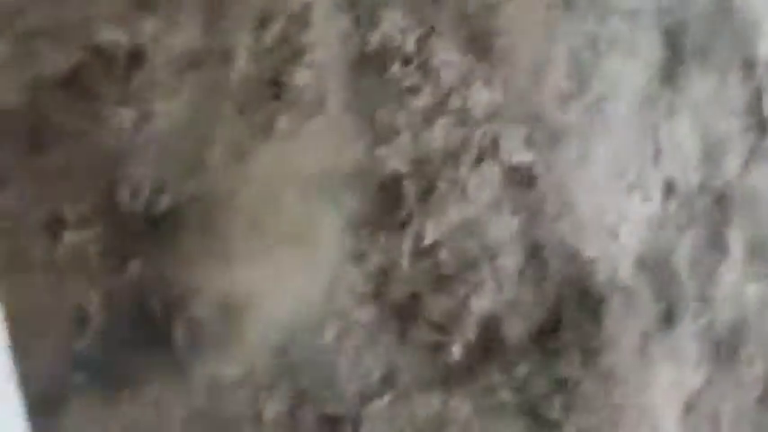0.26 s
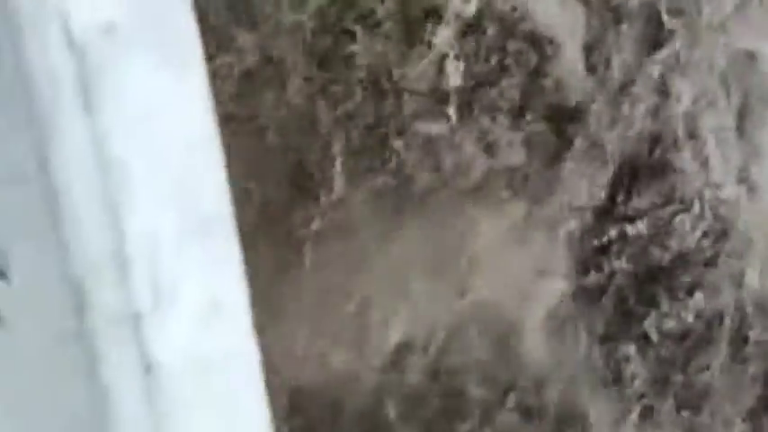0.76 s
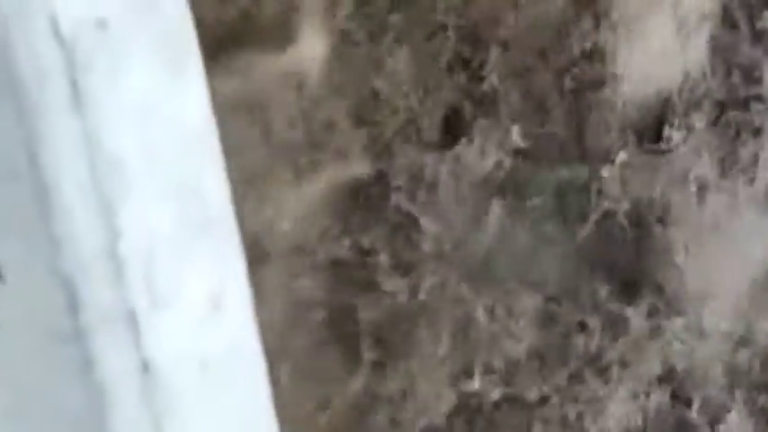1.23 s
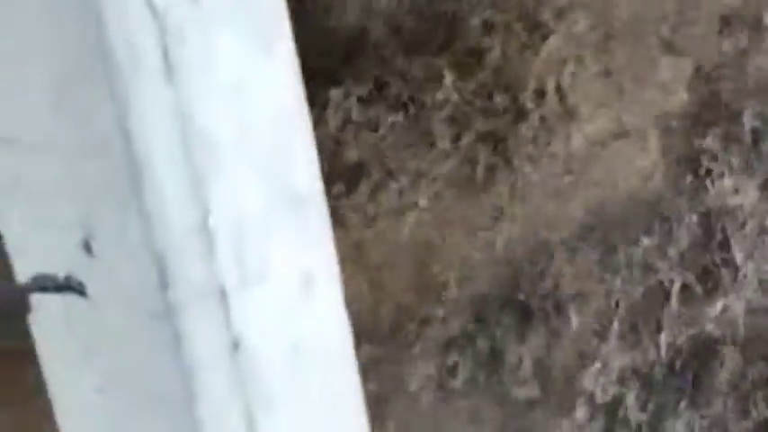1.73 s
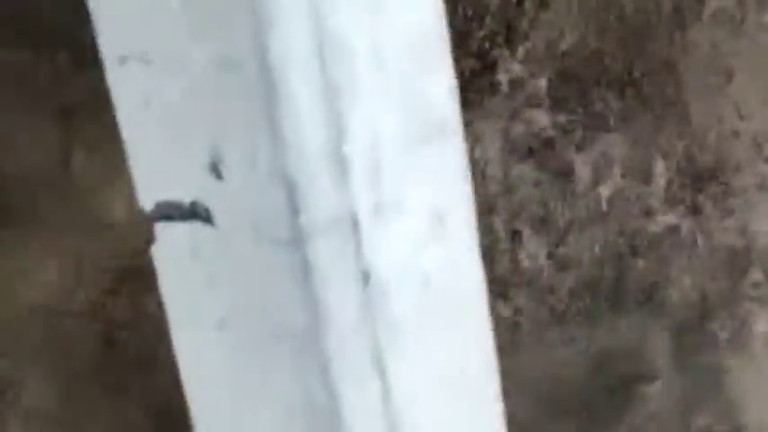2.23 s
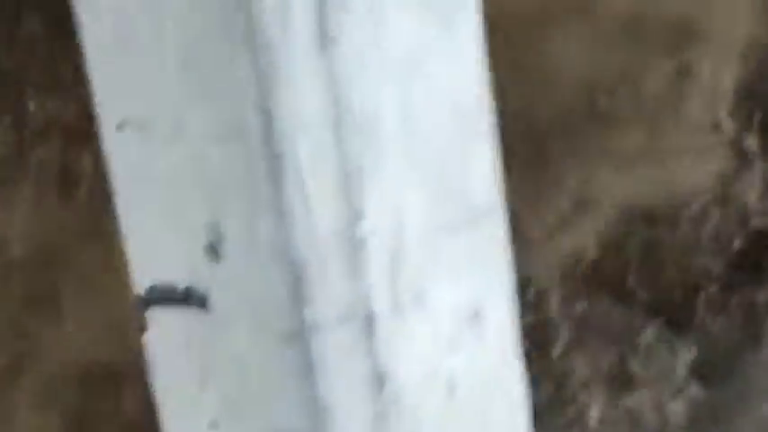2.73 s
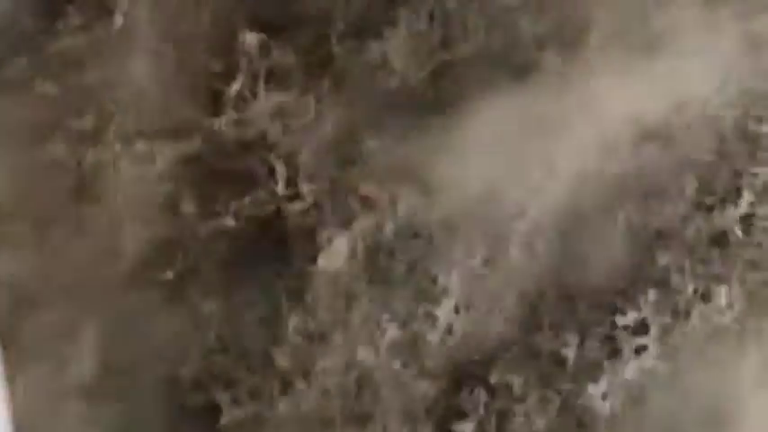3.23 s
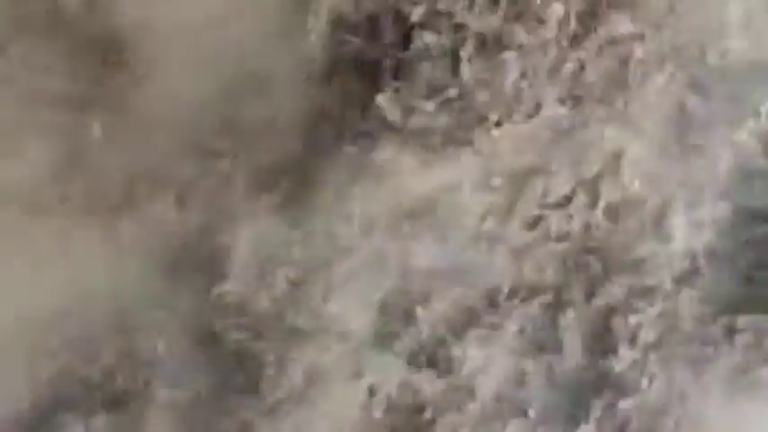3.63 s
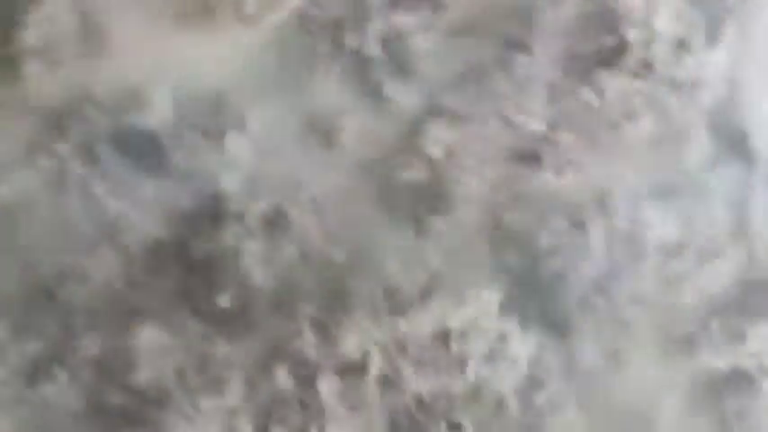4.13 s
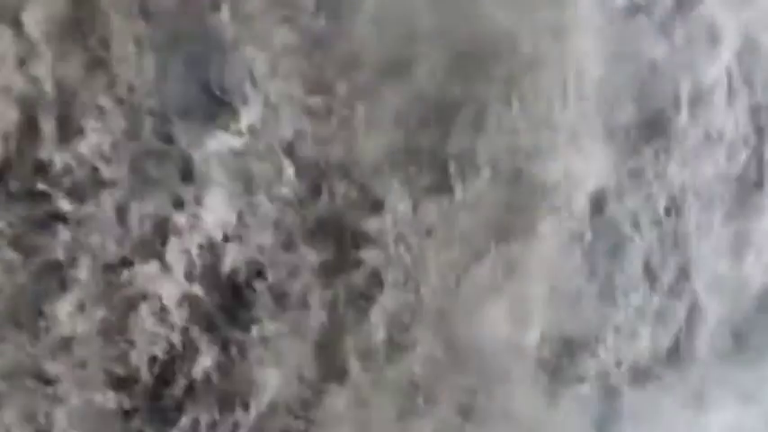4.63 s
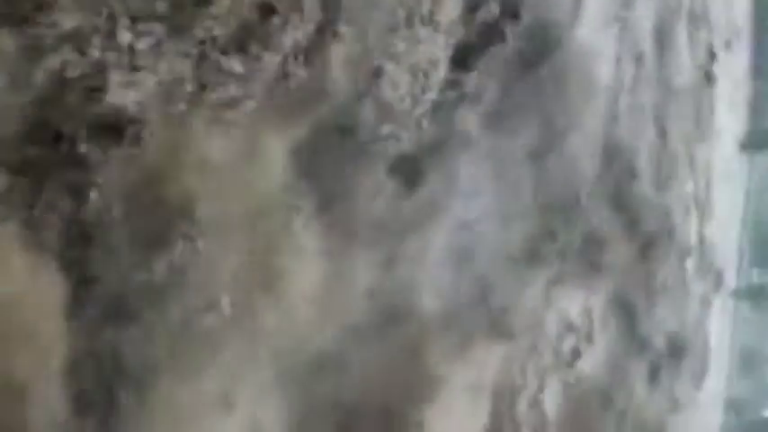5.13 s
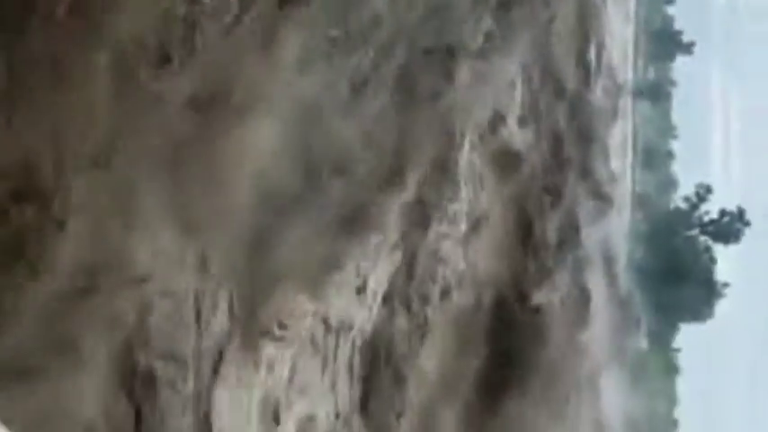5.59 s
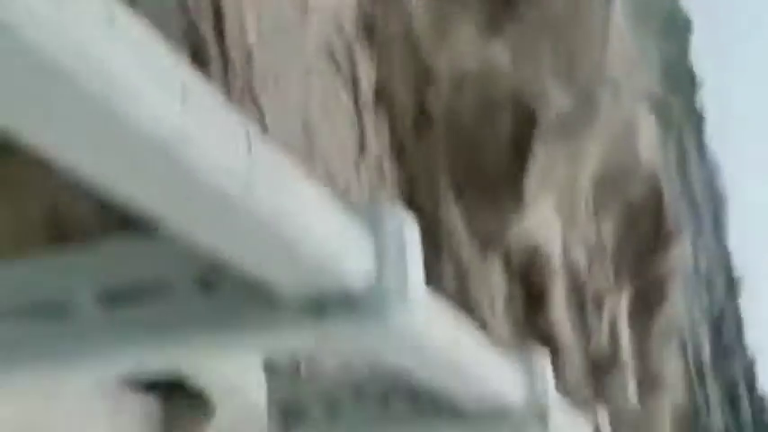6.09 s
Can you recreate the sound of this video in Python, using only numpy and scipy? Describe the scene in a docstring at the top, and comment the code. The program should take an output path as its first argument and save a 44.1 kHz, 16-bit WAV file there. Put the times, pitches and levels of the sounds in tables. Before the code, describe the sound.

A flooded muddy river roars continuously at close range, deep rumble and thick churning under a bright, hissing fizz of spray and bursting bubbles.

```python
"""A muddy river in flood roars under a bridge, at the two sound ports of a hand-held phone.
Countless bursting bubbles merge into rumble, body, churn and fizz from all sides: noise that surges unevenly.
Near drops add a faint spray of short rising tones.
Each port adds a treble resonance, and the hand shades the left one, swings out past the beam and tilts up."""
import sys
import numpy as np
from scipy import signal
from scipy.io import wavfile
from scipy.ndimage import uniform_filter1d

SR = 44100
rng = np.random.default_rng(int(sys.argv[2]) if len(sys.argv) > 2 else 0)


def volts(x):
    """Linear amplitude factor 10**(x/20) for a level x in dB, scalar or array-like."""
    e = np.asarray(x, float) / 20
    return 10 ** e


def unload_audio(sound):
    """Save the sound as a 16-bit wav file, at the path given as the first command line argument."""
    columns = np.transpose(np.atleast_2d(sound))
    # keep every value between -1 and 1, then stretch to whole-number steps
    steps = np.round(np.clip(columns, -1, 1) * 32767)
    wavfile.write(sys.argv[1], SR, steps.astype(np.int16))


N = 280035
FRAME, HOP = 1024, 256  # length and spacing of the short spectra, samples


def evened(x):
    """Scales to rms 1."""
    return x / np.sqrt(np.mean(x ** 2) + 1e-20)


def read(points, hz):
    """Reads a curve of (pitch, value) points on a log-frequency axis."""
    f, value = np.transpose(points)
    return np.interp(np.log(hz + 1), np.log(f + 1), value)


def unit(points, hz):
    """Turns a dB spectrum into a column of gains with rms 1."""
    return evened(volts(read(points, hz)))[:, None]


def hand(t):
    """The three movements of the hand at times t: held out, left port shaded, tilted up."""
    # how the hand moves the phone: time_s, held out past the beam (0-1),
    # left port shaded (0-1), tilted up from the water (0-1)
    hand_path = [(0, 0, 1, 0), (.5, 0.3, 1, .1), (1.4, 0.24, 0.8, 0.54), (1.6, 0, 0, .1), (2.2, .2, 0, 0.2),
                 (2.9, 0, 0.1, 0.1), (3.3, 0.66, 0.3, 0.04), (4.2, 1, .05, 0.1), (4.7, 0.74, .05, 0.15),
                 (5.1, 0.15, .2, 0.2), (5.4, .2, 0.4, 0.5), (5.9, 0.45, 0.4, 0.9), (6.35, .2, .3, 0.7)]
    time_s, *movements = np.transpose(hand_path)
    return [np.clip(np.interp(t, time_s, m), 0, 1) for m in movements]


def surges(t, layer_count, wave_count=24):
    """Slow random swells of rms 1, one row for each layer: sine waves, weaker when faster."""
    rates_hz = np.geomspace(.8, 3, wave_count)[:, None]
    phases = rng.random((layer_count, wave_count, 1))
    waves = np.sin(2 * np.pi * (rates_hz * t + phases)) / np.sqrt(rates_hz)
    return evened(waves.sum(axis=1))


def spray(count=24):
    """Near drops: short rising bubble tones of random size and pitch, left or right."""
    spray_db, drops_per_s = -36, 2800
    size_db = 2.0 * np.minimum(rng.exponential(1, N), 5)
    drops = volts(size_db) * (rng.random(N) < drops_per_s / SR)
    kind = rng.integers(0, count, N)
    out = np.zeros((2, N))
    for k, hz in enumerate(np.geomspace(1500, 9000, count)):
        cycles = np.arange(0, 6, hz / SR)
        tone = np.sin(2 * np.pi * cycles * (1 + 0.025 * cycles))  # the pitch rises as it rings
        bubble = tone * np.exp(-cycles / 2) * (1 - np.exp(-cycles * 4))
        out[k % 2] += signal.oaconvolve(drops * (kind == k), bubble)[:N]
    return volts(spray_db) * evened(out)


def torrent():
    """Merged bubbles as noise: random short spectra, coloured as four layers with drifting patches."""
    # colour of each layer: pitch_hz, level per Hz (dB, only the shape counts)
    rumble_colour = [(15, -15), (30, -1.5), (60, 1), (80, -3), (130, 0), (200, -1), (320, -0.5), (480, -7),
                     (800, -33.5)]
    body_colour = [(300, -9), (500, -1), (750, 0), (1200, -2.5), (1500, -4.5), (2000, -19.5)]
    churn_colour = [(1000, -17.5), (1500, -2.5), (1900, -0.5), (2400, -5), (3100, -12), (4000, -18)]
    fizz_colour = [(2200, -27), (3100, -1), (3600, 2), (6000, 2.5), (9000, 0.5), (14000, -4)]
    # likeness of the two ports in sound from all sides: pitch_hz, correlation (-1 to 1)
    port_likeness = [(60, .92), (180, .91), (280, .88), (400, .82), (560, .5), (800, .45), (1120, -.05),
                     (1400, -.25), (1800, -.05), (2300, .15), (2700, 0.0), (3100, -.35), (3700, 0.0)]
    # rumble, body, churn, fizz in rows: level_db before the ports,
    # change when held out past the echoing beam (dB), random surging (dB)
    layers = [(-21.5, -3.5, 0.6), (-23, -2.8, 0.78), (-24, -0.5, 0.67), (-22.5, .4, 0.17)]
    fizz_pan_db, tilt_pan_db = -3, -3.5  # left minus right, and its change when tilted up
    patchy_db, flicker_db = 1.06, 0.99  # unevenness of the fizz, rms

    frames, hz = N // HOP + 5, np.fft.rfftfreq(FRAME, 1 / SR)
    t = np.arange(frames) * HOP / SR
    out, _, tilted = hand(t)
    level_db, out_db, surge_db = np.transpose(layers)[:, :, None]
    layer_db = level_db + out_db * out + surge_db * surges(t, len(layers))
    rumble_db, body_db, churn_db, fizz_db = layer_db

    # white noise at both ports, partly alike
    a, b, c, d, left_patch, right_patch = rng.standard_normal((frames, len(hz), 6)).T
    left, other = a + 1j * b, c + 1j * d
    same = np.clip(read(port_likeness, hz), -1, 1)[:, None]
    z = np.array([left, same * left + np.sqrt(1 - same ** 2) * other])

    # breaking crests brighten patches some 600 Hz wide and 70 ms long, apart for each port
    patches = np.array([left_patch, right_patch])
    patches = uniform_filter1d(patches, size=14, axis=1)
    patches = evened(uniform_filter1d(patches, size=12, axis=2))
    # splashes lift the whole fizz for a few frames, apart for each port
    flicker = rng.standard_normal((frames, 2)).T
    flicker = evened(uniform_filter1d(flicker, size=6))[:, None]

    sides_db = np.array([.5, -.5])[:, None, None] * (fizz_pan_db + tilt_pan_db * tilted)
    uneven_db = patchy_db * patches + flicker_db * flicker
    fizz = unit(fizz_colour, hz) * volts(fizz_db + sides_db + uneven_db)
    # body and churn share the same patches; the long rumble waves are equally loud at both ports
    body = unit(body_colour, hz) * volts(body_db + 1.5 * patches)
    churn = unit(churn_colour, hz) * volts(churn_db + 1.03 * patches)
    rumble = unit(rumble_colour, hz) * volts(rumble_db + 0.55 * patches[0])
    z *= np.sqrt(rumble ** 2 + body ** 2 + churn ** 2 + fizz ** 2)

    # plain white noise sets the scale
    white = signal.istft(left, nperseg=FRAME, noverlap=FRAME - HOP)[1]
    return signal.istft(z, nperseg=FRAME, noverlap=FRAME - HOP)[1][:, :N] / np.std(white)


def scene():
    """The flood and the spray at the two ports."""
    return torrent() + spray()


def port_resonances(z, hz):
    """The small cavity behind each port rings and adds power around its own pitch."""
    # left and right port in rows: pitch_hz, width_hz, added power at the peak (dB over the plain sound)
    port_cavities = [(10060, 1620, 16), (8470, 1240, 13)]
    for k, (port_hz, width_hz, peak_db) in enumerate(port_cavities):
        added_power = volts(2 * peak_db) / (1 + (2 * (hz - port_hz) / width_hz) ** 2)
        z[k] *= np.sqrt(1 + added_power)[:, None]
    return z


def moving_hand(z, hz, t):
    """The hand changes the tone: a hollow near 3 kHz, and the treble when tilted or shaded."""
    # what tilting fully up does to the treble: pitch_hz, change_db
    tilt_tone = [(3000, -0.1), (5000, -2.3), (8000, -0.6), (10000, 0.3), (13000, -4.5)]
    # what full shading does to the left port: pitch_hz, change_db
    shade_tone = [(2500, 0), (3500, 1.5), (5000, -3), (6200, -.8), (7500, 3), (9000, .8), (10500, -.8),
                  (13000, 0.0)]
    out, shaded, tilted = hand(t)
    # the hollow moves up and deepens when held out, and fills when shaded
    hollow_hz = 3110 + 200 * out
    hollow_db = -1.1 - 3 * out + 2.5 * shaded
    z *= volts(np.exp(-((hz[:, None] - hollow_hz) / 330) ** 2) * hollow_db)
    z *= volts(read(tilt_tone, hz)[:, None] * tilted)
    z[0] *= volts(read(shade_tone, hz)[:, None] * shaded)
    return z


def port_lean(z, hz):
    """The two ports differ in level, by an amount that depends on pitch."""
    # lean of the two ports: pitch_hz, left minus right (dB)
    lean_curve = [(150, -1.8), (300, -2), (600, .2), (1200, -0.1), (2200, 1.8), (4000, 0.3)]
    return z * volts(np.array([[.5], [-.5]]) * read(lean_curve, hz))[:, :, None]


def centre_bass(z, hz, size=8):
    """Closes left and right to their mean in each bass band, except in random spells of about 50 ms."""
    # bass bands: top of the band (Hz), share of the time it is spread (0-1)
    bass_spread = [(190, .22), (270, .33), (350, .5), (440, .75)]
    tops_hz, shares = np.transpose(bass_spread)
    frames = z.shape[2]
    spells = rng.random((frames // size + 1, len(shares)))
    spells = spells.repeat(size, axis=0)[:frames].T
    # the last row, for all higher pitches, is always spread
    opened = np.vstack([spells < shares[:, None], np.ones(frames)])
    opened = opened[np.searchsorted(tops_hz, hz)]
    mid, side = (z[0] + z[1]) / 2, (z[0] - z[1]) / 2 * opened
    return np.array([mid + side, mid - side])


def top_cut(x):
    """Nothing passes above the cut-off."""
    return signal.sosfilt(signal.butter(12, 14320, fs=SR, output="sos"), x)


def record(dry):
    """Port resonances, the moving hand, centred bass, soft saturation, band limit and clipping."""
    knee, edge_hz = 2.7, 14280  # amplitude at which the microphone would saturate; top of the band
    hz, t, z = signal.stft(dry, SR, nperseg=FRAME, noverlap=FRAME - HOP)
    z = port_resonances(z, hz)
    z = moving_hand(z, hz, t)
    z = port_lean(z, hz)
    z = centre_bass(z, hz)
    heard = signal.istft(z, nperseg=FRAME, noverlap=FRAME - HOP)[1][:, :N]
    heard = knee * np.tanh(heard / knee)
    low_pass = signal.firwin(1023, edge_hz, window=("kaiser", 9), fs=SR)
    heard = signal.oaconvolve(heard, low_pass[None], "same")
    mix = np.clip(heard, -1, 1)
    return top_cut(mix)


dry = scene()
out = record(dry)
unload_audio(out)
```